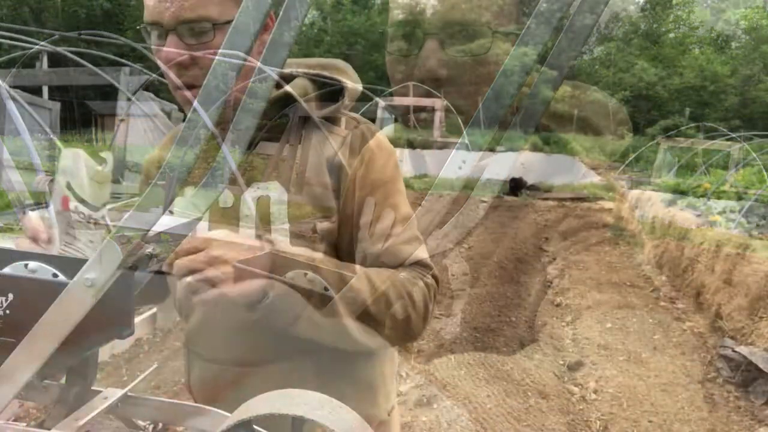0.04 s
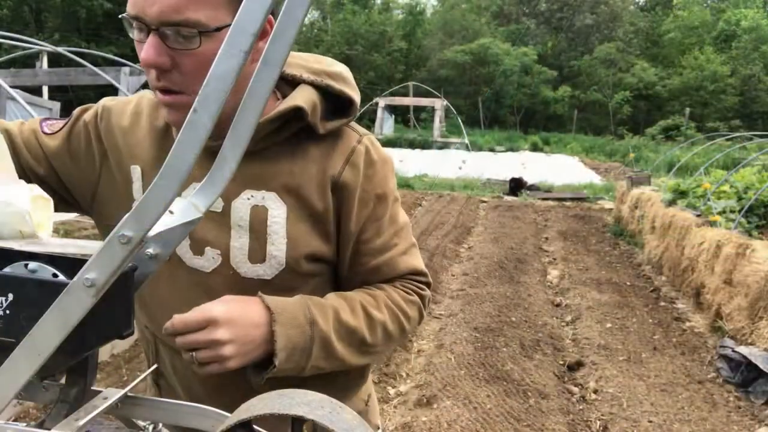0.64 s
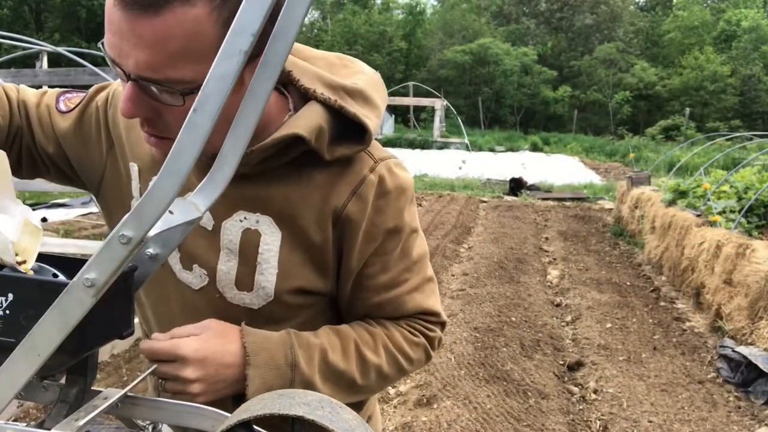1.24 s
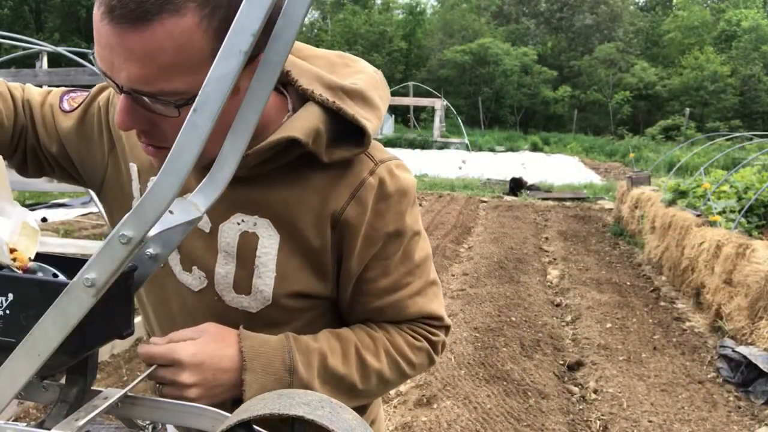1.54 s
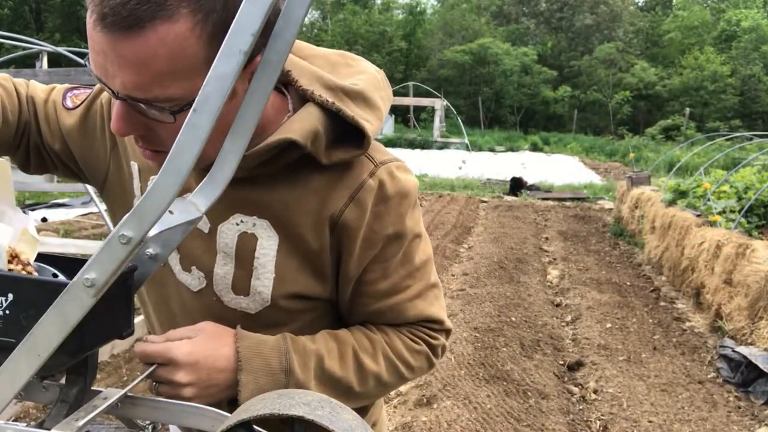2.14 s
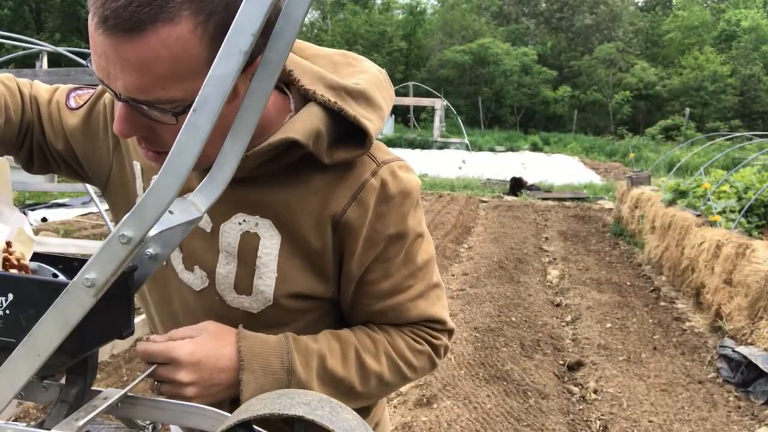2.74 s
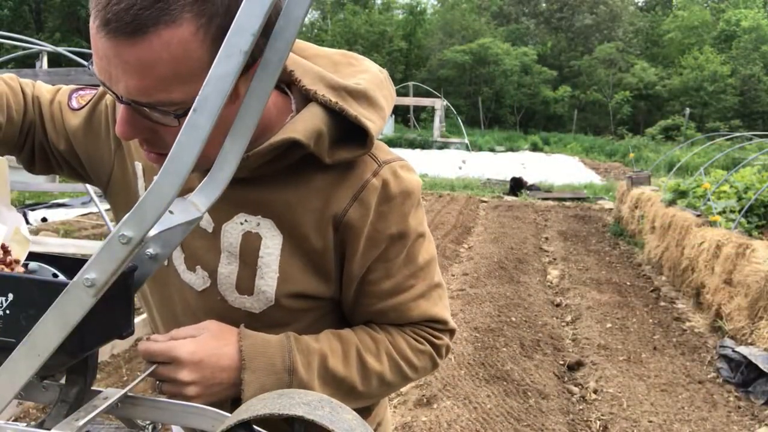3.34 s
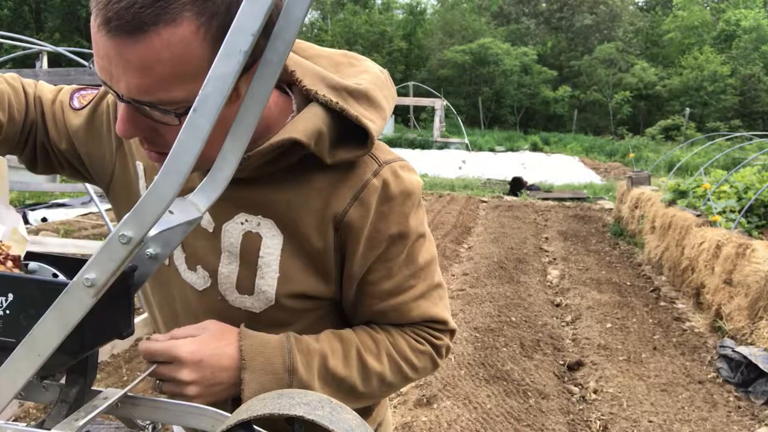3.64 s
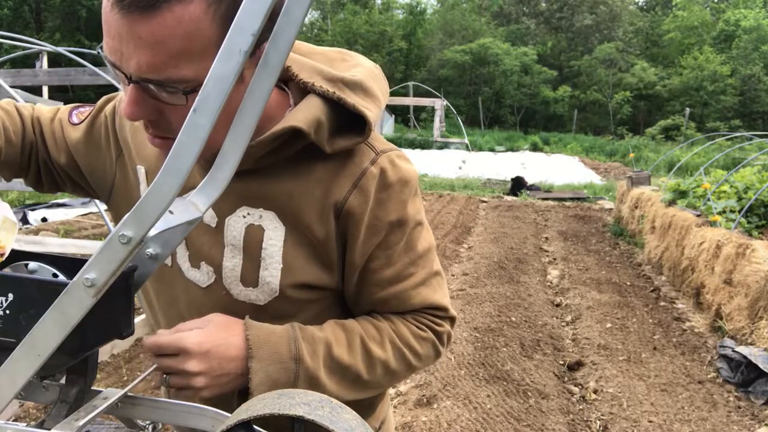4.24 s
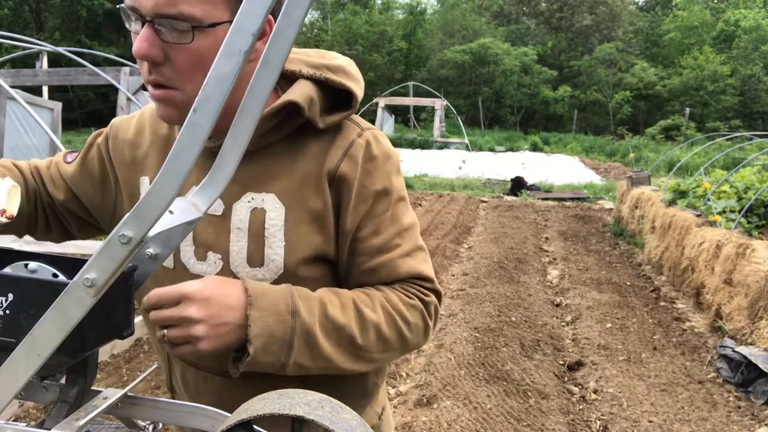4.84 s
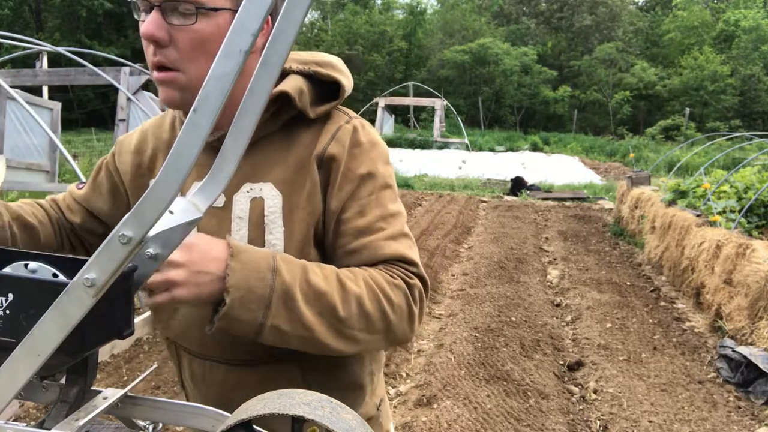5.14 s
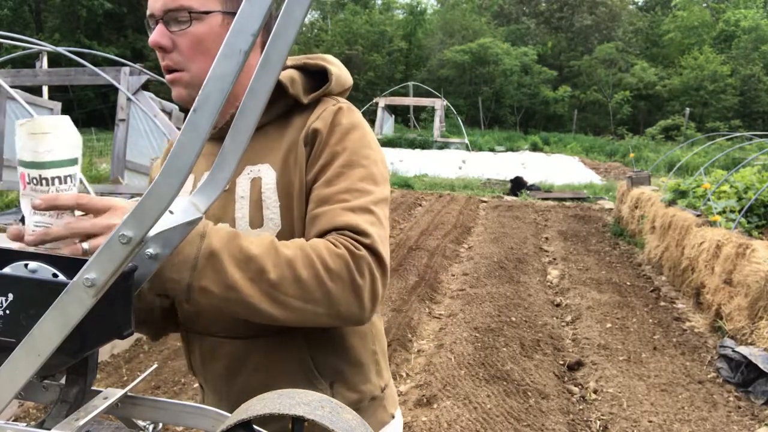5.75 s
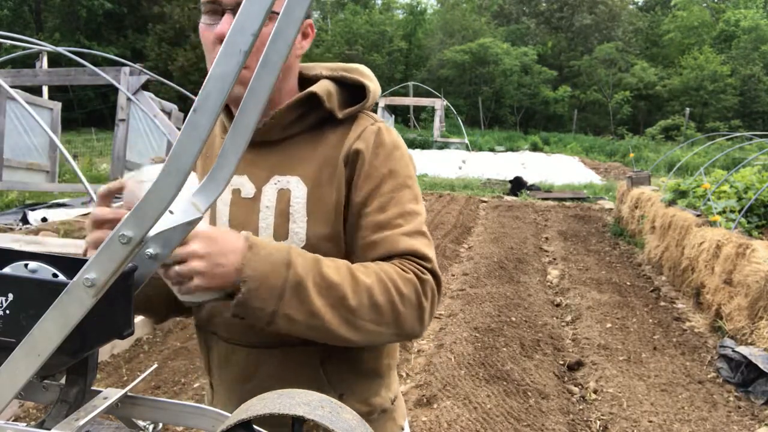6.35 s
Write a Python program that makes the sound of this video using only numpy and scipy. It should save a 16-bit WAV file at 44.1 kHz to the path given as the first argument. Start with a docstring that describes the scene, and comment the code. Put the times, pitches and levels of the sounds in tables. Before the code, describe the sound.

Large dry seeds pour from a paper packet, rattling into a plastic hopper, then the packet crinkles in a quiet garden.

```python
"""Large dry seeds pour from a paper packet into the plastic hopper of a push seeder, in a quiet garden.
They scrape down the paper, drop singly, then in a stream, and the last ones bounce in; each hit rings
the hopper, and the growing heap dulls the hits. A sleeve swishes as the packet is lifted and brought
back, then the paper crinkles in the hands. Distant trees hiss; the microphone catches a light breeze
and a few soft bumps."""
import sys
import numpy as np
from scipy import signal
from scipy.fft import rfft, irfft, next_fast_len
from scipy.io import wavfile
from scipy.ndimage import map_coordinates

SR = 44100
rng = np.random.default_rng(int(sys.argv[2]) if len(sys.argv) > 2 else 0)


def put_to_file(sound):
    """Save the sound as 16-bit audio at rate SR, in the file named by the first command-line argument."""
    columns = np.atleast_2d(sound).T  # one column per channel
    safe = np.clip(columns, -1, 1)
    whole_steps = np.round(safe * 32767)
    wavfile.write(sys.argv[1], SR, whole_steps.astype(np.int16))


N = 286160

# The loudest seeds to strike the hopper. Each row: start in seconds, level in dB.
SEED_HITS = [(1.181, -15.5), (1.324, -22.5), (1.36, -30.5), (1.458, -19), (1.537, -20), (1.585, -19),
             (1.628, -17), (1.661, -31), (1.672, -16), (1.696, -22.5), (1.724, -20), (1.743, -26.5),
             (1.779, -22.5), (1.803, -24), (1.81, -15.5), (1.836, -28), (1.844, -17), (1.898, -27),
             (1.975, -20), (1.991, -20.5), (2.009, -24.5), (2.037, -22), (2.075, -18), (2.103, -24),
             (2.131, -22), (2.156, -17.5), (2.189, -17), (2.208, -22.5), (2.243, -15.5), (2.257, -21.5),
             (2.269, -21), (2.292, -18), (2.33, -23.5), (2.361, -15.5), (2.375, -18), (2.389, -19),
             (2.401, -19), (2.44, -16.5), (2.477, -14), (2.489, -24.5), (2.509, -17.5), (2.597, -17.5),
             (2.708, -17.5), (2.749, -19), (2.855, -17), (2.88, -18), (2.922, -15), (2.956, -14),
             (3.029, -18.5), (3.051, -19), (3.092, -21.5), (3.204, -20), (3.285, -15), (3.302, -23),
             (3.336, -20), (3.349, -18.5), (3.369, -17), (3.418, -19.5), (3.446, -19), (3.495, -21),
             (3.585, -18), (3.645, -22), (3.737, -18), (3.76, -20.5), (3.825, -22.5), (3.875, -19),
             (3.984, -23.5), (4.002, -23.5), (4.076, -26.5), (4.12, -25), (4.127, -19.5), (4.158, -21),
             (4.274, -25), (4.3, -23), (4.353, -18), (4.364, -26.5), (4.387, -22.5), (4.401, -26.5),
             (4.44, -24), (4.446, -21), (4.481, -31), (4.514, -42), (4.575, -20.5), (4.66, -24),
             (4.674, -34.5), (4.686, -36.5), (4.725, -35)]
DULLING_DB_PER_S = 1  # the first seed meets bare plastic; the growing heap dulls later ones


def seeds():
    """Single seeds and the stream strike the hopper, whose ring changes as the heap grows."""
    # Resonances of the hopper's air and walls. Each row: centre in Hz, width in Hz,
    # boost in dB when empty, boost in dB with a heap inside.
    hopper_modes = [(580, 36, 6, 6), (669, 132, 13, 11.5), (952, 39, 10, 7), (1054, 200, -2.5, 10.5),
                    (1198.5, 123, 14, 8.5), (1394, 57, 8, 7.5), (1750, 132, 11, 5.5), (2037, 76, 6.5, 0),
                    (2312, 100, 7.5, 8), (2585, 240, 3.5, 7.5), (2885, 530, 5, 3.5), (3395, 146, 8.5, 8),
                    (4150, 460, 6, 4), (4530, 164, 7, 3), (5240, 210, 6.5, 7.5), (5665, 380, 7.5, 6.5),
                    (6290, 470, 6.5, 6.5), (6950, 380, 5.5, 7.5), (7870, 93, 7.5, 3), (9900, 650, 3, 0.5),
                    (11400, 130, -4, -2.5), (11250, 460, 2.5, 3), (12380, 250, 4, 1), (13640, 460, 5, 5.5),
                    (14900, 300, 4.5, 4)]
    # Tone of a seed's contact. Each row: frequency in Hz, gain in dB.
    contact_eq = [(60, -37.5), (200, -28.5), (470, -24.5), (590, -8.5), (850, -4), (1600, -5.5),
                  (3000, -0.5), (3700, -3), (4900, -4), (6600, -1.5), (7500, -5), (9700, -6), (10400, -11),
                  (11200, -6.5), (16000, -13)]
    # Tone the soft heap gives a landing. Each row: frequency in Hz, gain in dB.
    cushion_eq = [(600, -1), (3000, 0.5), (7000, 0.5), (11000, -0.5), (16000, 0)]
    singles = cracks(seed_bounces(contacts=3),
                     hold=0.00051, t60=0.03, treble_t60=0.024, pivot_hz=4260, rise=0.000086)
    landings = cracks(seed_stream(peak_per_s=245, spread_db=5.5, count=1000),
                      hold=0.0011, t60=0.03, treble_t60=0.02, pivot_hz=3700, rise=0.00038)
    hits = singles + equalise(landings, cushion_eq)
    hz, width, empty_db, heaped_db = np.transpose(hopper_modes)
    empty = resonate(hits, contact_eq, zip(hz, width, empty_db))
    heaped = resonate(hits, contact_eq, zip(hz, width, heaped_db))
    fill = np.interp(np.arange(N) / SR, [2.7, 3.8], [0, 1])
    return (1 - fill) * empty + fill * heaped


def seed_bounces(contacts):
    """Cues for cracks(): each seed lands and bounces, weaker and duller at every contact."""
    bare_bright_db, loss_db, dull_db = 4, 25.5, 10
    start, db = np.transpose(SEED_HITS)
    hardness, flight = rng.standard_normal((len(start), 2)).T
    bright_db = bare_bright_db - DULLING_DB_PER_S * (start - start[0]) + 1.7 * hardness
    flight_s = 0.026 * np.exp(.25 * flight)
    return np.vstack([np.transpose([start + k * flight_s, db - k * loss_db, bright_db - k * dull_db])
                      for k in range(contacts)])


def seed_stream(peak_per_s, spread_db, count):
    """Cues for cracks(): seeds land unevenly on the heap; a fuller stream is denser and louder."""
    # Swell of the pour. Each row: time in seconds, level in dB.
    flow = [(1.6, -56), (1.68, -38.5), (1.85, -36), (1.92, -42), (2.02, -36), (2.31, -35), (2.41, -26),
            (2.72, -24.5), (2.87, -29), (3.06, -26.5), (3.22, -31), (3.36, -27.5), (3.54, -32),
            (4.12, -32.5), (4.41, -36), (4.49, -55.5)]
    flow_db, = envelopes(flow)
    t = np.arange(N) / SR
    pouring = (t > flow[0][0]) & (t < flow[-1][0])
    density = pouring * amp(.55 * (flow_db - flow_db.max()))
    poured = peak_per_s * np.cumsum(density) / SR
    lateness, weight, hardness = rng.uniform(-1, 1, (count, 3)).T
    turn = np.arange(count) + 1 + .7 * lateness
    at = np.minimum(np.searchsorted(poured, turn), N - 1)
    # fewer seeds share the level when the stream is thin
    db = flow_db[at] - 10 * np.log10(density[at] + 0.16) + spread_db * weight
    bright_db = 3 - DULLING_DB_PER_S * (at / SR - SEED_HITS[0][0]) + 5 * hardness
    return np.transpose([at / SR, db, bright_db])[turn < poured[-1]]


def seed_slide():
    """Seeds scrape along the inside of the tilted packet."""
    # Swell of the scrape. Each row: time in seconds, level in dB.
    swell = [(.95, -73), (1.25, -41), (1.33, -37.5), (1.49, -36), (1.57, -42.5), (3.2, -41), (3.9, -37.5),
             (4.3, -45), (4.7, -69)]
    # Tone of seeds on paper. Each row: frequency in Hz, gain in dB.
    scrape_eq = [(150, -38.5), (250, -15), (480, -14), (680, -9.5), (1580, -1), (2000, -1.5), (4400, -3.5),
                 (4850, -11), (5630, -7), (6300, -13), (7000, -10), (10300, -23.5), (12000, -22),
                 (16000, -29.5)]
    level_db, = envelopes(swell)
    gain = amp(level_db + 1.2 * wobble(45))
    return gain * coloured(friction(slips_per_s=1500, spread_db=1.5, hiss=0.89), scrape_eq)


def packet():
    """Sleeve and paper rub as the packet is lifted, brought back and gripped; its creases snap."""
    # The sleeve's swish on the lift. Each row: time in seconds, level in dB.
    lift_swell = [(0.42, -56), (0.462, -48.5), (0.532, -38.5), (0.732, -29.5), (0.768, -37), (0.866, -33),
                  (0.882, -36.5), (1.12, -43), (1.16, -42.5)]
    # The arm swings back, fast and light, then pressing. Each row: time in seconds, level in dB,
    # low rustle and hiss in dB relative to that level.
    return_swell = [(5.35, -56, -11, -5), (5.448, -46.5, -21.5, 1), (5.68, -29.5, -10, -7),
                    (5.778, -38, -7, -13), (5.91, -63, -11, 2.5)]
    # Hand and sleeve brush the paper. Each row: start in seconds, length in seconds, level in dB,
    # low rustle and hiss in dB relative to that level.
    brushes = [(.04, 0.014, -60.5, -19, -12), (0.136, 0.026, -60.5, -19, -9),
               (5.169, 0.034, -50, -22, -4.5), (5.297, 0.041, -49.5, -26, -3), (5.946, 0.089, -51, -6, -7),
               (6.097, 0.093, -46.5, -7, -5), (6.228, 0.12, -51.5, -5.5, -1.5),
               (6.395, 0.14, -58.5, -7, -10)]
    # Creases that snap. Each row: start in seconds, level in dB, brightness in dB.
    creases = [(.455, -33, 13), (5.844, -36.5, 5), (5.933, -34, 9), (5.965, -32.5, 2), (5.987, -35.5, 0),
               (6.081, -17.5, 11.5), (6.112, -27.5, -3), (6.131, -39, -9), (6.175, -32, -3),
               (6.247, -44.5, -33), (6.333, -39.5, 3), (6.466, -36, 2.5)]
    # Tones of the lift, the later handling and the snaps. Each row: frequency in Hz, gain in dB.
    lift_eq = [(100, -29), (200, -25.5), (370, -13), (560, -13), (800, -9.5), (950, -6.5), (1120, -5.5),
               (1550, 2.5), (1950, -4), (2400, 0), (3300, -6), (4900, -12), (6500, -11.5), (10300, -23.5),
               (11500, -23), (16000, -28)]
    handling_eq = [(100, -37), (250, -17), (380, -3.5), (520, -5.5), (800, -2.5), (980, 5), (1300, 2.5),
                   (1650, 6.5), (1950, 2.5), (2450, 3.5), (3500, -3.5), (4900, -13.5), (6300, -13.5),
                   (10300, -25.5), (11500, -25), (16000, -31)]
    snap_eq = [(60, -36), (160, -9), (380, 3.5), (600, -7), (950, 3.5), (1300, 8.5), (1900, 2), (2700, -1),
               (5000, -14.5), (6200, -11), (10000, -28.5), (16000, -43)]
    low_db, hiss_db = -15.5, -8.5
    lift = stroke([(s, db, low_db, hiss_db) for s, db in lift_swell], t60=0.57)
    handling = stroke(return_swell, t60=0.12) + sum(brush(*row) for row in brushes)
    snaps = cracks(np.vstack([creases, crinkles(per_s=77, spread_db=4, count=80)]),
                   hold=0.0021, t60=0.032, treble_t60=0.013, pivot_hz=3450, rise=.0001)
    return rub(lift, lift_eq) + rub(handling, handling_eq) + resonate(snaps, snap_eq)


def rub(gains, eq):
    """Cloth and paper rub: pressure adds low rustle, speed adds hiss, a light touch lets paper ring."""
    def below(hz, edge_hz):
        return 1 / (1 + (hz / edge_hz) ** 8)

    fibres = coloured(friction(slips_per_s=2400, spread_db=2.0, hiss=0.91), eq)
    low = unit_rms(filtered(fibres, lambda hz: below(hz, 840)))
    mids = unit_rms(filtered(fibres, lambda hz: below(hz, 4400) - below(hz, 740)))
    hiss = unit_rms(filtered(fibres, lambda hz: 1 - below(hz, 3970)))
    # the packet's flat side rings when it is rubbed
    ring = unit_rms(filtered(rng.standard_normal(N), lambda hz: hump(hz, centre=1540, width=280)))
    return amp(0.98 * wobble(90)) * np.sum(gains * [mids, low, hiss, ring], axis=0)


def stroke(rows, t60):
    """Gains of mids, low rustle, hiss and paper ring over one rub, dying away after its last row."""
    level_db, low_db, hiss_db = envelopes(rows)
    t = np.arange(N) / SR
    level_db = level_db - 60 * np.maximum(t - rows[-1][0], 0) / t60
    ring_db = level_db - 27.5 - low_db  # pressing damps the paper
    return (t >= rows[0][0]) * amp([level_db, level_db + low_db, level_db + hiss_db, ring_db])


def brush(start, length, db, low_db, hiss_db):
    """A brief stroke on the paper: it swells, eases while it lasts, then releases."""
    attack_s, rise_db, sag_db_per_s = 0.075, 14, 11
    shape = [(start - attack_s, db - rise_db), (start, db), (start + length, db - sag_db_per_s * length)]
    return stroke([(s, level, low_db, hiss_db) for s, level in shape], t60=0.093)


def crinkles(per_s, spread_db, count):
    """Cues for cracks(): small folds give way at random under the fingers."""
    # Swell of the crinkling as the grip tightens. Each row: time in seconds, level in dB.
    grip = [(5.78, -62), (5.95, -46), (6.12, -44), (6.33, -52), (6.4, -64)]
    grip_s, grip_db = np.transpose(grip)
    lateness, weight, hardness = rng.uniform(-0.92, 1, (count, 3)).T
    start = grip_s[0] + (np.arange(count) + lateness) / per_s
    db = np.interp(start, grip_s, grip_db) + spread_db * weight
    bright_db = 6 + 5 * hardness
    return np.transpose([start, db, bright_db])[start < grip_s[-1]]


def reflections(x, t60, delay):
    """The seeder's frame and the ground scatter a faint, dull tail."""
    t = np.arange(SR // 2) / SR
    tail = rng.standard_normal(len(t)) * amp(-60 * t / t60) * (t > delay)
    wet = signal.fftconvolve(x, tail / np.linalg.norm(tail))[:N]
    return equalise(wet, [(300, -3.5), (2500, -1.5), (6000, -12), (15000, -12.5)])


def breeze():
    """Gusts and their eddies buffet the microphone with a low rumble."""
    # The gusts. Each row: time in seconds, level in dB.
    gusts = [(0, -64.5), (.85, -60), (2.1, -64.5), (3.15, -69.5), (3.5, -54), (3.92, -70), (4.07, -54),
             (4.7, -55), (4.85, -64), (5.07, -57), (5.8, -56.5), (5.95, -69)]
    # Tone of the rumble. Each row: frequency in Hz, gain in dB.
    rumble_eq = [(15, -36), (30, -1), (52, 5), (70, 4), (95, -9.5), (130, -14), (200, -23.5), (400, -28),
                 (1000, -65)]
    gust_db, = envelopes(gusts)
    eddies_db = 3.1 * wobble(19)
    return amp(gust_db + eddies_db) * coloured(rng.standard_normal(N), rumble_eq)


def bumps(rise):
    """Soft bumps on the microphone, each a low push of a few cycles."""
    # The bumps. Each row: start in seconds, level in dB, pitch in Hz.
    thumps = [(3.49, -42, 105), (4.595, -38, 153), (4.666, -38, 62), (5.102, -42, 89.5), (5.355, -48, 112),
              (5.6, -41, 75)]
    out = np.zeros(N)
    for start, db, hz in thumps:
        t = np.maximum(np.arange(N) / SR - start, 0)
        envelope = t / rise * np.exp(1 - t / rise)
        out += amp(db) * envelope * np.sin(2 * np.pi * hz * t)
    return out


def trees():
    """Distant trees hiss softly, drifting a little in level."""
    # Tone of the trees. Each row: frequency in Hz, gain in dB.
    trees_eq = [(30, -28), (110, -1), (200, -8.5), (340, -5), (500, -10), (1200, -14), (1700, -11),
                (6000, -23.5), (10000, -31.5), (16000, -34.5)]
    return amp(-63 + 1.1 * wobble(2.73)) * coloured(rng.standard_normal(N), trees_eq)


def cracks(cues, hold, t60, treble_t60, pivot_hz, rise, size=1024):
    """One noise burst per cue. Each cue: start in seconds, level in dB, brightness in dB."""
    start, db, bright_db = np.transpose(cues)
    t, hz = np.arange(size) / SR, np.fft.rfftfreq(size, 1 / SR)
    tilt = np.tanh(np.log((hz + 1) / pivot_hz) * 2) / 2
    noise = rng.standard_normal((len(start), size))
    spectrum = rfft(noise) * amp(bright_db[:, None] * tilt)
    # after the hold, the treble dies sooner than the body of the sound
    decay_s = np.maximum(t - hold, 0)
    body = irfft(spectrum * (.5 - tilt)) * amp(-60 * decay_s / t60)
    treble = irfft(spectrum * (.5 + tilt)) * amp(-60 * decay_s / treble_t60)
    # square blows start at once, glancing ones a little more slowly
    attack = 1 - np.exp(-t / (rise * np.exp(noise[:, -1:])))
    bursts = (body + treble) * attack
    bursts /= bursts[:, t < .003].std(axis=1, keepdims=True)  # the first 3 ms set the level
    at = np.round(start * SR).astype(int)[:, None] + np.arange(size)
    return np.bincount(at.ravel(), (amp(db[:, None]) * bursts).ravel(), N)[:N]


def friction(slips_per_s, spread_db, hiss):
    """Tiny slips of uneven size over a smooth hiss."""
    slips = (rng.random(N) < slips_per_s / SR) * rng.choice([-1, 1], N)
    sizes = amp(spread_db * np.clip(rng.standard_normal(N), -2, 2))
    return unit_rms(unit_rms(slips * sizes) + hiss * rng.standard_normal(N))


def resonate(x, eq, modes=(), size=4096):
    """Ring x through a body of unit energy: a smooth tone curve with resonant humps."""
    hz = np.fft.rfftfreq(size, 1 / SR)
    db = eq_db(eq, hz) + sum(boost * hump(hz, centre, width) for centre, width, boost in modes)
    # minimum phase, so the ring follows the hit
    cepstrum = irfft(np.log(amp(db)))
    cepstrum[1:size // 2] *= 2
    cepstrum[size // 2 + 1:] = 0
    ring = irfft(np.exp(rfft(cepstrum)))
    return signal.fftconvolve(x, ring / np.linalg.norm(ring))[:N]


def hump(hz, centre, width):
    """A resonance peak of height 1."""
    return 1 / (1 + (2 * (hz - centre) / width) ** 2)


def amp(db):
    """Decibels to gain."""
    return 10 ** (np.asarray(db) / 20)


def unit_rms(x):
    """Scale to rms 1."""
    return x / np.sqrt(np.mean(x ** 2) + 1e-20)


def envelopes(rows):
    """One value per sample for each column after the time."""
    s, *columns = np.transpose(rows)
    return [np.interp(np.arange(N) / SR, s, column) for column in columns]


def wobble(rate):
    """A smooth random curve with rate knots a second."""
    knots = rng.standard_normal(int(N * rate / SR) + 4)
    return map_coordinates(knots, [np.arange(N) * rate / SR])


def eq_db(eq, hz):
    """Read a tone curve in dB on a log frequency axis."""
    points_hz, db = np.transpose(eq)
    return np.interp(np.log(hz + 1), np.log(points_hz + 1), db)


def filtered(x, response):
    """Filter x by a gain that is a function of frequency."""
    size = next_fast_len(N + SR // 2)
    return irfft(rfft(x, size) * response(np.fft.rfftfreq(size, 1 / SR)), size)[:N]


def equalise(x, eq):
    """Filter x by a tone curve."""
    return filtered(x, lambda hz: amp(eq_db(eq, hz)))


def coloured(x, eq):
    """Give a noise its tone and rms 1."""
    return unit_rms(equalise(x, eq))


def scene():
    """Seeds and packet close by, in open air, in mono."""
    near = seeds() + seed_slide() + packet()
    tail = amp(-17.5) * reflections(near, t60=0.77, delay=0.0041)
    return (near + tail + breeze() + trees() + bumps(rise=0.0043))[None]


def record(dry):
    """The top end rolls off steeply at 16 kHz."""
    return filtered(dry[0], lambda hz: 1 / (1 + (hz / 16000) ** 120))[None]


dry = scene()
out = record(dry)
put_to_file(out)
```